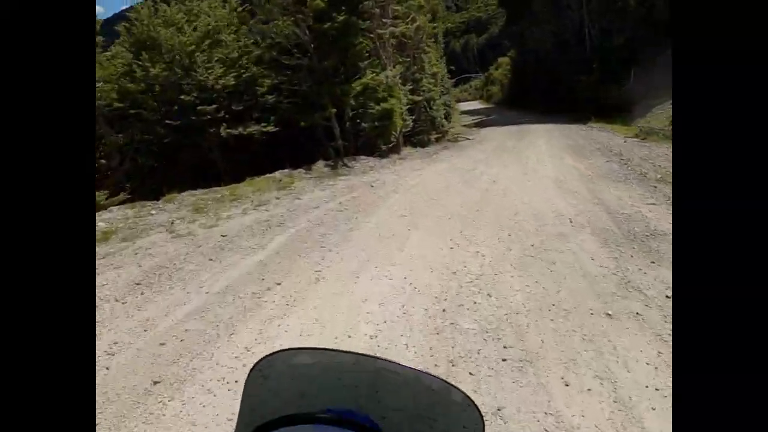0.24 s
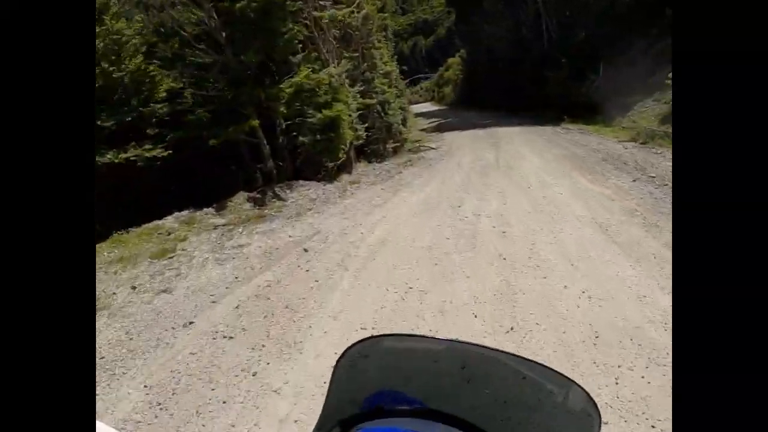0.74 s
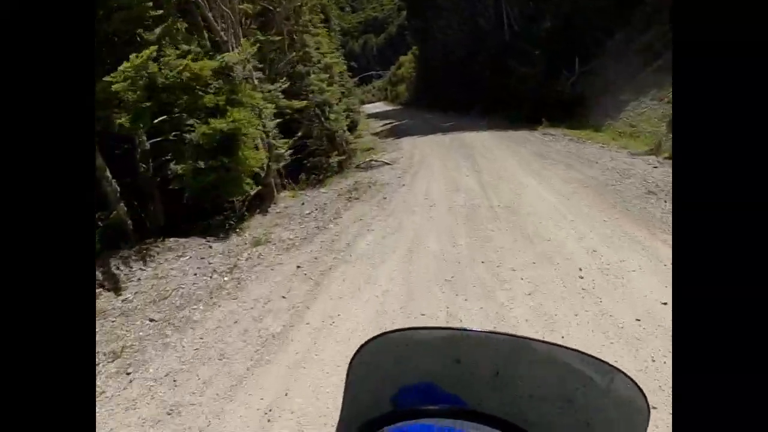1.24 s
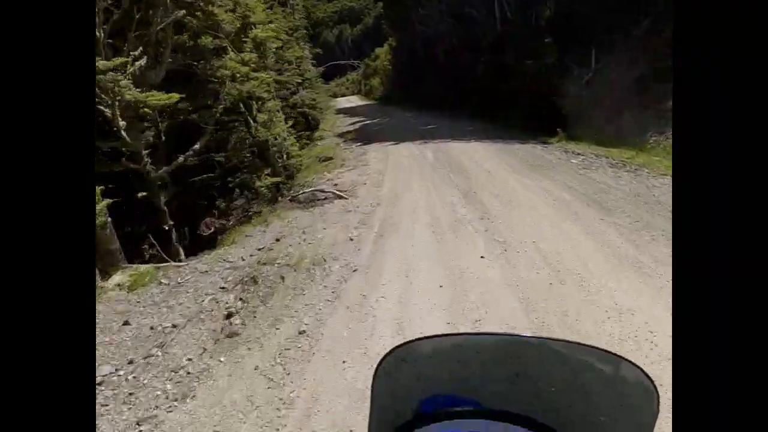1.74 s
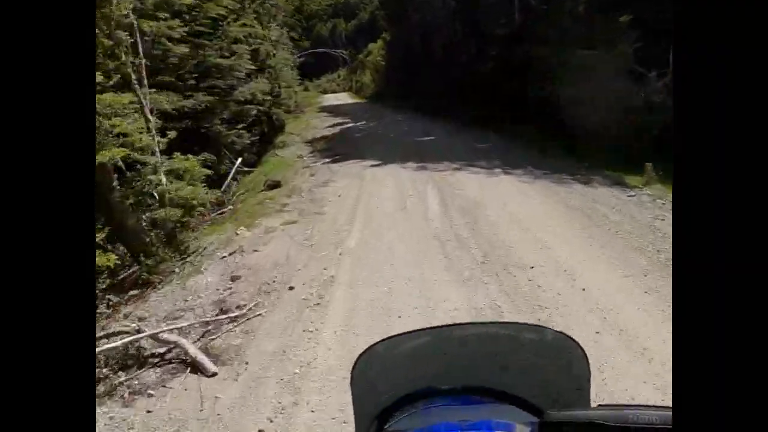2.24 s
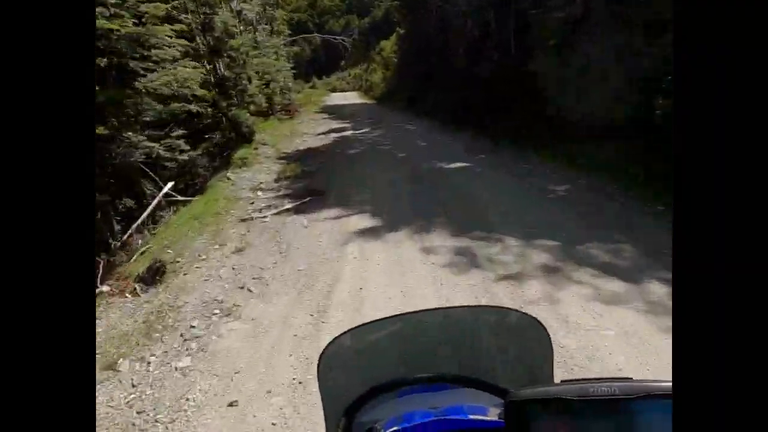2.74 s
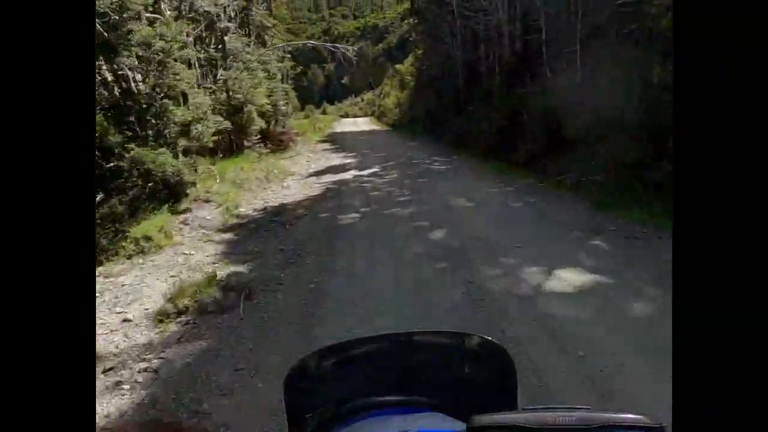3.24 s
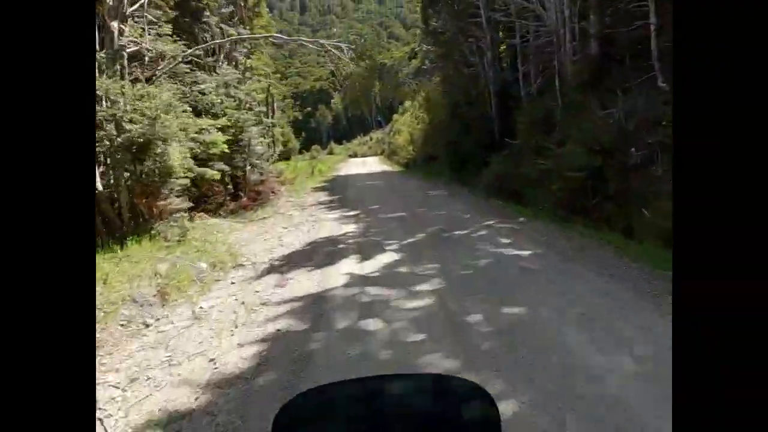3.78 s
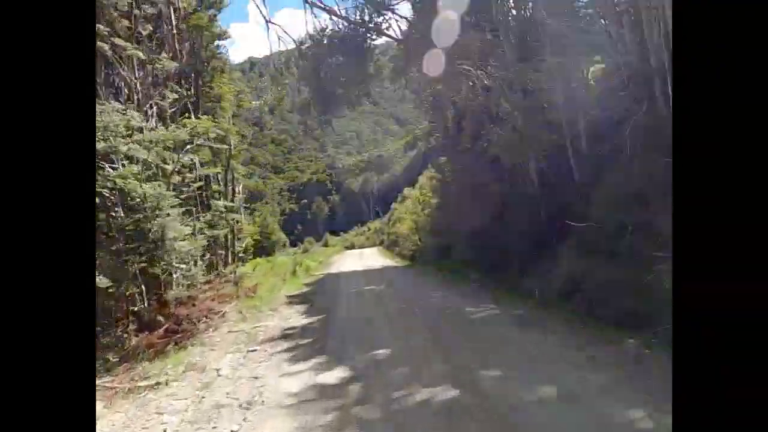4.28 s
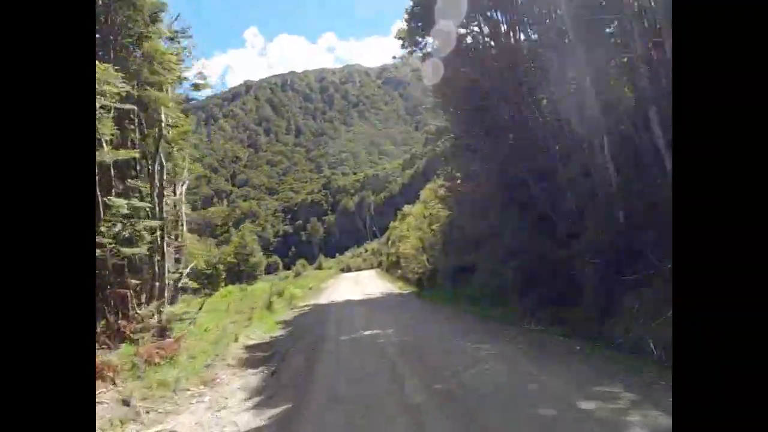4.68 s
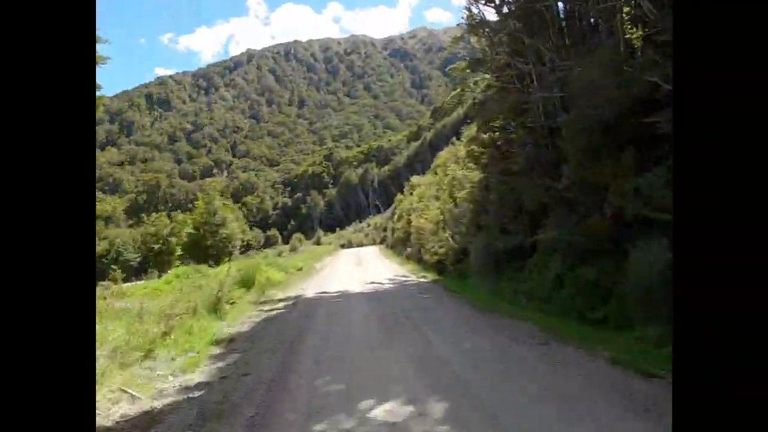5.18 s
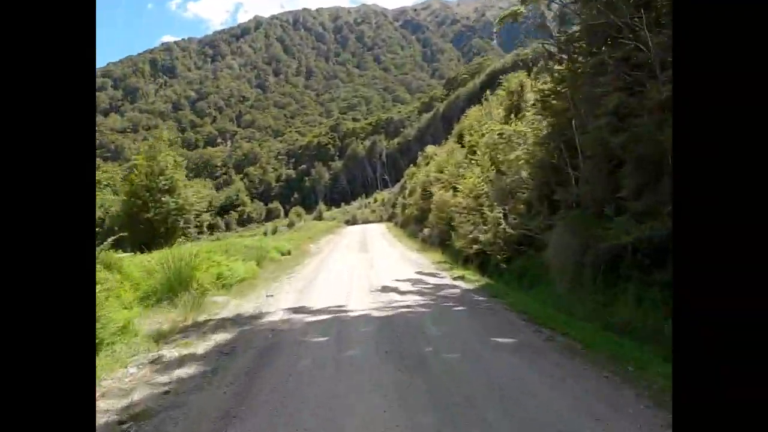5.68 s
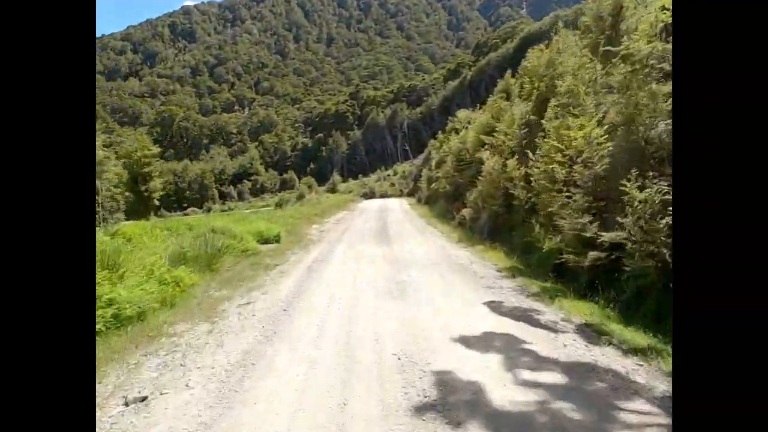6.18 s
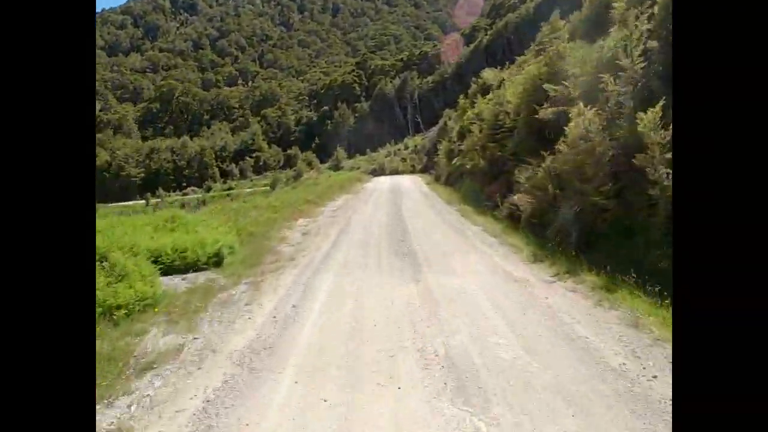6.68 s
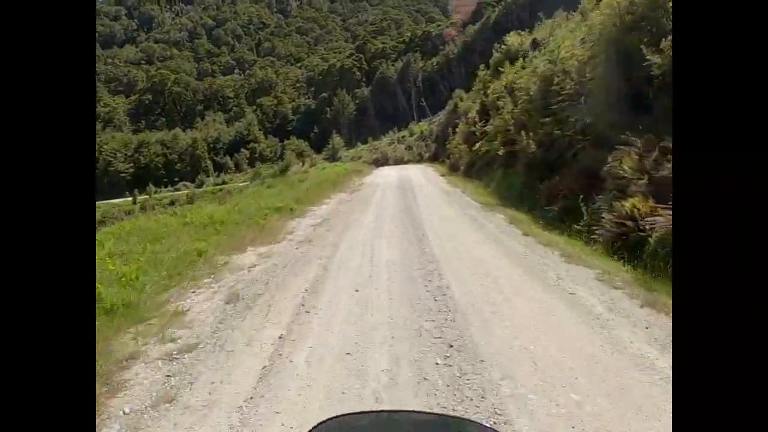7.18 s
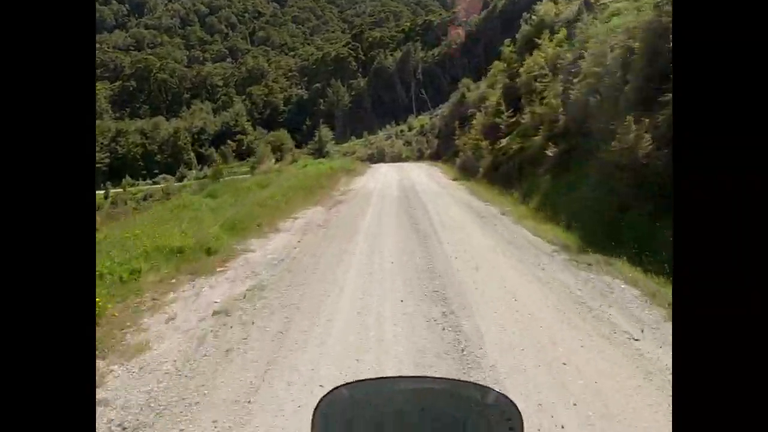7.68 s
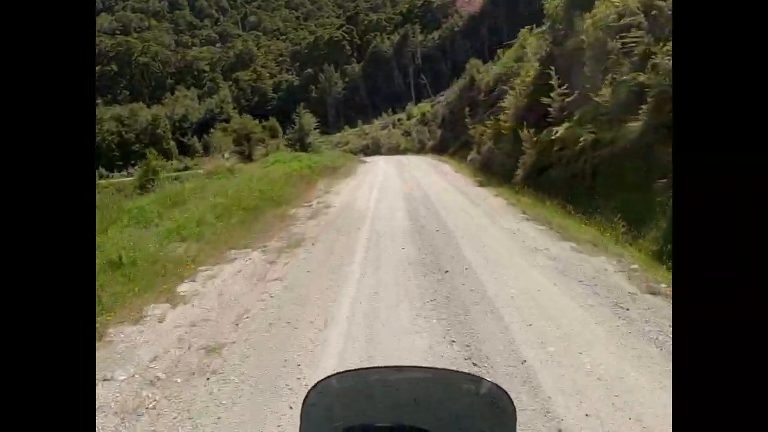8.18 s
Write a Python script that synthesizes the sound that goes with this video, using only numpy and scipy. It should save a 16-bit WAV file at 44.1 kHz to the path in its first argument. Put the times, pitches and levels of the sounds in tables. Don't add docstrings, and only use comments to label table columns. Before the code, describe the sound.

Close, boxy helmet-mounted sound of a motorcycle riding outdoors over gravel. The engine accelerates with a nasal metallic ring, eases briefly, then holds a fast, even putter with varying load. Wind rush and low rumble build to a fluttering peak midway, then ease. Loose-part knocks crowd the first two seconds and return in a hard cluster after six seconds, stronger on the right; a thin whistle wavers near the end.

```python
import sys
import numpy as np
from scipy import signal
from scipy.fft import rfft, irfft, next_fast_len
from scipy.io import wavfile
from scipy.ndimage import uniform_filter1d

SR = 44100
rng = np.random.default_rng(int(sys.argv[2]) if len(sys.argv) > 2 else 0)


def invert_db(level):
    return 10 ** (np.asarray(level, dtype=float) / 20)


def unload_audio(sound):
    columns = np.transpose(np.atleast_2d(sound))
    steps = np.round(np.clip(columns, -1, 1) * 32767)
    wavfile.write(sys.argv[1], SR, steps.astype(np.int16))


N = 371322
SIZE = next_fast_len(N + 8192)
HZ = np.maximum(np.fft.rfftfreq(SIZE, 1 / SR), 1)
MILD_AIR_DB, MILD_BUFFET_DB = -41, -28

# [t/s, level/dB]
ENGINE_LOAD = [(0, -24.5), (.45, -19.5), (1, -16.5), (1.25, -14), (1.75, -15.5), (1.95, -18), (2.1, -30),
               (2.55, -28.5), (2.9, -20.5), (3.4, -21.5), (3.7, -18.5), (4.4, -24), (4.9, -21.5),
               (5.6, -19), (6.1, -24), (7.15, -28), (7.65, -24), (8.42, -22)]
# [t/s, rush level/dB, buffeting level/dB]
AIR_FLOW = [(0, -45, -35), (.5, -48.5, -31.5), (1.1, -47.5, -33), (1.8, -42.5, -32), (2.4, -42, -32.5),
            (2.799, -36.5, -28.5), (3.3, -36.5, -27), (4.1, -39.5, -27), (4.35, -37, -22.5),
            (4.7, -39.5, -19.5), (5.5, -36.5, -18.5), (6.1, -39, -22), (6.4, -40.5, -30.5), (7, -41.5, -27),
            (7.4, -38.5, -32), (7.8, -40.5, -28.5), (8.05, -36.5, -27.5), (8.42, -36, -26)]


def in_time(rows):
    s, *columns = np.transpose(rows)
    t = np.arange(N) / SR
    return [np.interp(t, s, column) for column in columns]


def drift(rate_hz):
    pole = np.exp(-80 * np.pi * rate_hz / SR)
    white = rng.standard_normal(N // 40 + 2002)
    slow = signal.lfilter([1], [1, -2 * pole, pole * pole], white)[2000:]
    slow = slow / np.sqrt(np.mean(slow ** 2) + 1e-20)
    return np.interp(np.arange(N) / 40, np.arange(len(slow)), slow)


def shell(force, modes, blows=0):
    shakes = rfft(force * rng.standard_normal((2, N)) + blows, SIZE)
    spectrum = np.zeros((2, len(HZ)), complex)
    for k, (hz, width, level_db, left_db, lag) in enumerate(modes):
        near = slice(*np.searchsorted(HZ, [hz - 9 * width, hz + 9 * width]))
        detuning = (HZ[near] - hz * hz / HZ[near]) / width
        peak = 1 / (1 + 1j * detuning) ** 2
        port_db = level_db + np.array([[left_db], [-left_db]]) / 2
        ports = invert_db(port_db) * [[np.exp(-1j * lag)], [1]]
        spectrum[:, near] += ports * peak * shakes[k % 2, near]
    ringing = irfft(spectrum, SIZE)[:, :N]
    return ringing / np.sqrt(np.mean(ringing.mean(axis=0) ** 2))


def wind_noise():
    # [f/Hz, width/Hz, level/dB, left minus right/dB, left lag/rad]
    drumming_modes = [(72.6, 49, -3.5, -2.5, 0.11), (107, 49, -11, -3, 0.65), (161.9, 23, 2, -9.5, 1.36),
                      (195.5, 47, -5, -6.5, 1.2)]
    rush_modes = [(240.8, 47, 16.5, -1.5, -0.36), (351.2, 83, 17, -3, 1.46), (373.3, 32, 9.5, 4, -0.91),
                  (470.4, 46, 7, -8, -.7), (546.4, 110, 10, -0.5, -0.058), (945, 287, 10, 5.5, -0.81),
                  (1229, 193, 16.5, 1, 0.45), (1513, 94, 4, 3.5, 2.9), (1693, 460, 2.5, -2, 0.86),
                  (7160, 480, -20, -2.5, 1.7)]
    howl_modes = [(682, 86, 0.5, -12.5, .2), (755, 78, -12, -10.5, -.5), (3707, 283, -13.5, 11.5, 1)]
    # [f/Hz, spectral level/dB per Hz]
    port_wind = [(20, 35), (60, 32), (130, 26), (300, 0.5), (800, 6), (1500, 3), (2500, -3), (4500, -8),
                 (6500, -18.5), (8000, -25.5)]
    rush_db, drum_db = in_time(AIR_FLOW)
    howl_db = -39 + 0.7 * (drum_db - MILD_BUFFET_DB) + 0.37 * (rush_db - MILD_AIR_DB)

    drumming = shell(invert_db(1.6 * drift(5.4)), drumming_modes)
    drumming = drumming / np.sqrt(uniform_filter1d(drumming[1] ** 2, size=7000) / 2)
    rush = shell(invert_db(1.4 * drift(30)), rush_modes)
    howl = shell(invert_db(2.0 * drift(23)), howl_modes)

    hz, wind_db = np.transpose(port_wind)
    gusty = rng.standard_normal((2, N)) * invert_db([0.83 * drift(15), 2.8 * drift(3.2)])
    colour = invert_db(np.interp(np.log(HZ), np.log(hz), wind_db))
    ports = irfft(rfft(gusty, SIZE) * colour, SIZE)[:, :N]
    air = invert_db(rush_db + 11.5) * (rush + ports)
    return invert_db(drum_db + 1.5) * drumming + invert_db(howl_db) * howl + air


def wobble():
    # [t/s, peak level/dB, dying time/s]
    jolts = [(.12, -13, 0.26), (.34, -10, 0.035), (.44, -11.5, 0.22), (.75, -9, 0.043), (.91, -10.5, 0.21),
             (1.4, -14.5, .05), (1.66, -7.5, 0.032), (1.779, -4.5, 0.012), (1.94, -8.5, 0.1),
             (2.37, -3.5, 0.059), (2.49, -9, 0.019), (2.72, -5.5, .06), (2.981, -7, 0.33), (3.42, -9, 0.11),
             (3.54, -7.5, 0.14), (3.7, -8.5, 0.065), (3.89, -5, 0.13), (4.74, -10.5, 0.063),
             (5.44, -9.5, .25), (5.7, -6.5, 0.024), (6.1, -13.5, 0.042), (6.21, -8, 0.031),
             (6.33, -8, 0.036), (6.41, -9.5, .2), (6.68, -8, 0.021), (6.78, -9, 0.021), (6.89, -11, 0.026),
             (7.39, -8.5, 0.15), (7.65, -15, 0.35), (8.16, -8.5, 0.054)]
    buffet_db = in_time(AIR_FLOW)[1] - MILD_BUFFET_DB
    t = np.arange(N) / SR
    hz = 43.17 + 0.43 * buffet_db
    size = invert_db(-19.5 - 0.2 * buffet_db)
    jolt_rise_s = 0.045
    for s, peak_db, dying_s in jolts:
        envelope = np.exp(np.minimum((t - s) / jolt_rise_s, (s - t) / dying_s))
        size = np.maximum(size, invert_db(peak_db) * envelope)

    phase = 2 * np.pi * np.cumsum(hz * (1 + 0.2 * drift(12))) / SR
    twist = 0.37 * np.array([drift(15), drift(14.0)])
    lumps = size * invert_db(2.0 + 1.2 * drift(37) + [[-0.8], [0.8]])
    swing = lumps * (np.sin(phase + twist) + 0.19 * np.sin(2 * phase + 3 * twist))

    flap_hz = 65.65 * (1 + 0.04 * drift(8))
    flap = np.sin(2 * np.pi * np.cumsum(flap_hz) / SR + twist)
    flap = flap * invert_db(-27 + 1.1 * buffet_db + 1.8 * drift(6.6))
    strap_limit = 0.6
    return strap_limit * np.tanh((swing + flap) / strap_limit)


def whistle():
    # [t/s, f/Hz, level/dB]
    edge_tone = [(2.3, 860, -53), (2.5, 865, -42), (2.9, 874, -42.5), (3.3, 906, -39), (3.8, 954, -38),
                 (4.15, 1004, -36), (4.3, 1053, -67), (6.2, 946, -66), (6.45, 928, -38.5),
                 (6.8, 916, -42.5), (7.3, 906, -41), (7.7, 893, -38.5), (7.8, 850, -34), (8.15, 873, -33.5),
                 (8.42, 883, -40)]
    hz, tone_db = in_time(edge_tone)
    phase = 2 * np.pi * np.cumsum(hz * (1 + 0.009 * drift(40))) / SR
    return invert_db(tone_db + 5.5 + 3.6 * drift(13)) * np.sin(phase + [[1.3], [0]])


def knocks():
    # [t/s, peak level/dB, direction/signed gain, snap level/dB]
    impacts = [(0.131, 3, 0.85, -25), (0.33, -1, -0.34, -9.5), (0.351, 9.5, 0.62, -12.5),
               (0.433, 3, -0.44, -8.5), (0.603, 2, 0.92, -29), (0.789, 9, 0.51, -14), (0.964, 4, 0.66, -29),
               (1.382, 2, 1, -24), (1.505, 1.5, 0.99, -28), (1.662, -12, -0.89, -22), (1.724, 1, 0.95, -27),
               (1.765, -10, -0.97, -27), (1.84, 2, 1, -28), (1.919, -16, 0.57, -25), (3.215, 0, 0.81, -35),
               (3.768, 2.5, 0.72, -26), (4.02, 0, 1, -17.5), (4.543, -3.5, -1.4, -39),
               (5.737, 1, 0.94, -19), (5.976, 1, 0.38, -29), (6.11, 2.5, 1, -34), (6.227, 12, 0.32, -12),
               (6.342, -1, 1, -22), (6.399, -5, -0.72, -19.5), (6.462, 4.5, 0.48, -26),
               (6.607, 4.5, 0.49, -31), (6.839, 8.5, 0.44, -17), (6.8619, 6, -0.59, -11),
               (6.871, -13, 0.34, -15)]
    s, peak_db, direction, snap_db = np.transpose(impacts)
    hits = np.zeros((2, N))
    hits[:, (s * SR).astype(int)] = direction * invert_db([peak_db, snap_db])

    lead = 600
    t = np.arange(-lead, 1400) / SR
    fade = np.where(t < 0, np.exp(-(t / 0.0023) ** 2), np.exp(-t / 0.0036))
    thud = np.cos(2 * np.pi * 150 * t - 0.3) * fade
    after = np.maximum(t + 0.0012, 0)
    body = 1.93 * np.sin(2 * np.pi * 330 * after) * np.exp(-after / 0.0033)
    click = 7.8 * np.sin(2 * np.pi * 620 * after) * after / 0.0011 * np.exp(-after / 0.00042)
    responses = [thud, body + click]
    thuds, snaps = signal.fftconvolve(hits, responses, axes=1)[:, lead:lead + N]

    stone_s, stone_db = 6.8615, -11
    stone = np.exp(-((np.arange(N) / SR - stone_s) / 0.0011) ** 2) * rng.standard_normal(N)
    stone_band = signal.butter(2, [800, 2600], "band", fs=SR, output="sos")
    snaps = snaps + invert_db(stone_db) * signal.sosfilt(stone_band, stone)
    left = invert_db(-8) * np.roll(thuds, shift=50) + invert_db(2.0) * np.roll(snaps, shift=12)
    return np.array([left, thuds + snaps])


def firing_beat(cycles, depth_db, second):
    turn = np.floor(2 * cycles).astype(int)
    uneven = 0.1 * rng.standard_normal(1000)[turn]
    decay = -2.2 * (cycles % 1) ** 1.5
    second_burst = second * (turn % 2) * (1 - 2 * cycles % 1)
    beat = uniform_filter1d(invert_db(depth_db * (decay + second_burst + uneven)), size=130)
    return beat / np.sqrt(uniform_filter1d(beat ** 2, size=9000))


def crank_blows(cycles, depth_db, second_db):
    turn = np.floor(2 * cycles).astype(int)
    strength_db = 27 + depth_db + second_db * (turn % 2) + 2 * rng.standard_normal(1000)[turn]
    return invert_db(strength_db) * (np.diff(turn, prepend=turn[0]) > 0)


def engine():
    # [t/s, firing rate/Hz]
    firing_rate = [(0, 18.41), (0.45, 20.42), (1, 24.76), (1.5, 28.39), (1.95, 31.37), (2.1, 30.76),
                   (2.55, 25.02), (2.85, 25.65), (3.2, 26.89), (3.7, 27.95), (4.1, 29.66), (4.35, 26.98),
                   (4.65, 29.21), (5.6, 28.6), (6, 28.51), (7.1, 28.51), (7.7, 28.58), (8.42, 28.01)]
    # [t/s, upper minus lower level/dB]
    head_angle = [(0, 1.5), (.9, -5.5), (1.5, 1), (2, -0.5), (2.5, 7.5), (3, 8), (3.5, 7), (4.5, 1),
                  (6.5, -3.5), (7, 0.5), (7.5, -3), (8, 2), (8.42, -2)]
    # [f/Hz, width/Hz, level/dB]
    low_ring = [(1076.5, 34, -5), (1181.3, 54, -0.5)]
    high_ring = [(1239.3, 66, 8.5), (1249, 11, -12)]
    # [f/Hz, width/Hz, level/dB, left minus right/dB, left lag/rad]
    clatter_modes = [(2090, 260, 4, -2, 2), (2610, 1000, 4.5, -8, 4), (3563, 940, 1, 16.5, 3.5),
                     (4075, 490, 0.5, -8.5, -1), (5000, 440, -4.5, -22.5, -8.5), (5660, 530, -6, -19, 2),
                     (6100, 450, -9.5, -19.5, -3.2), (7350, 320, -14, 8.5, -13.5)]
    rasp_modes = [(4150, 240, 3.5, -5.5, 0.62), (2550, 140, -6.5, -7, 1.5), (6230, 86, -16, -11, 0.67)]
    (ring_db,), (upper_db,), (speed,) = map(in_time, (ENGINE_LOAD, head_angle, firing_rate))
    rush_db = in_time(AIR_FLOW)[0]
    load_db = ring_db + 21
    depth_db = np.maximum(6 - 0.1 * load_db - 0.5 * (speed - speed.mean()), 0)
    cycles = 0.71 + np.cumsum(speed) / SR

    blows = crank_blows(cycles + 0.13, depth_db, second_db=-9)
    force = firing_beat(cycles + 0.13, 0.65 * depth_db, second=0.6)
    left_db, lag = 2.8, 0.92
    low = [(*mode, left_db, lag) for mode in low_ring]
    high = [(*mode, left_db, lag) for mode in high_ring]
    ring = shell(force, low, blows) + invert_db(upper_db) * shell(force, high, blows)
    ring = ring * firing_beat(cycles + 0.089, 0.5 * depth_db, second=0.3)
    ring = ring / np.sqrt(uniform_filter1d(ring.mean(axis=0) ** 2, size=4000))

    clatter = shell(firing_beat(cycles + 0.15, 0.74 * depth_db, second=0.1), clatter_modes)
    clatter_db = -42.5 + 0.54 * load_db + 0.069 * (rush_db - MILD_AIR_DB)
    rasp = shell(firing_beat(cycles + 0.087, 1.2 * depth_db, second=0.33), rasp_modes)
    rasp_db = 1.24 * ring_db - 22.5
    return invert_db(ring_db) * ring + invert_db(rasp_db) * rasp + invert_db(clatter_db) * clatter


def scene():
    return wind_noise() + wobble() + whistle() + knocks() + engine()


def low_pass(x):
    return signal.sosfilt(signal.butter(12, 15600, fs=SR, output="sos"), x)


def record(dry):
    treble_cut = signal.cheby2(10, 50, 8750, fs=SR, output="sos")
    cut = signal.sosfilt(treble_cut, dry)
    ring_db = in_time(ENGINE_LOAD)[0]
    hiss_band = signal.butter(2, [8800, 12000], "band", fs=SR, output="sos")
    hiss = signal.sosfilt(hiss_band, rng.standard_normal(dry.shape))
    hiss_db = -60 + 0.3 * ring_db + 1.5 * drift(5)
    limited = np.clip(cut + invert_db(hiss_db) * hiss, -1, 1)
    mix = limited * np.clip((N - np.arange(N)) / 200, 0, 1)
    return low_pass(mix)


dry = scene()
out = record(dry)
unload_audio(out)
```